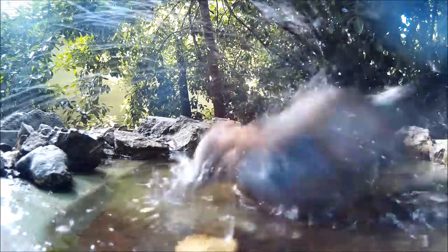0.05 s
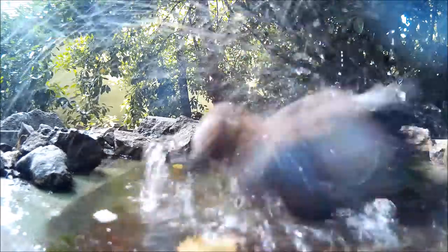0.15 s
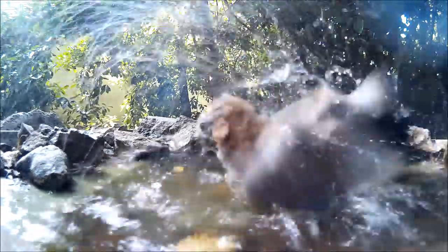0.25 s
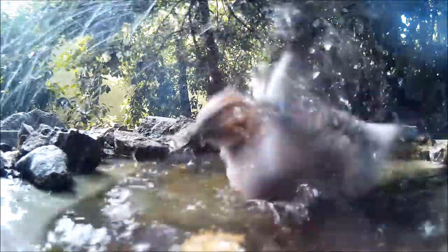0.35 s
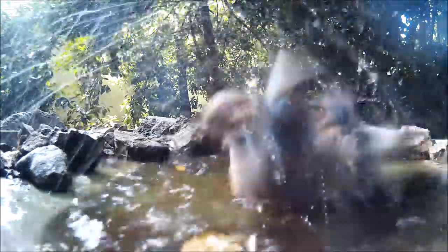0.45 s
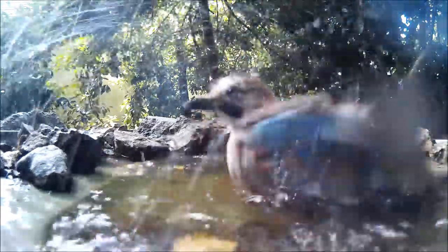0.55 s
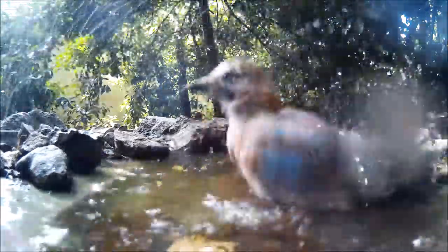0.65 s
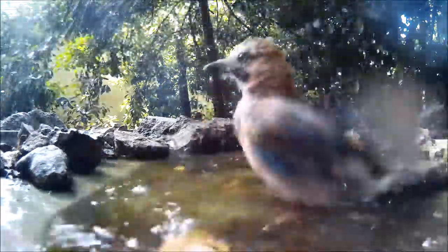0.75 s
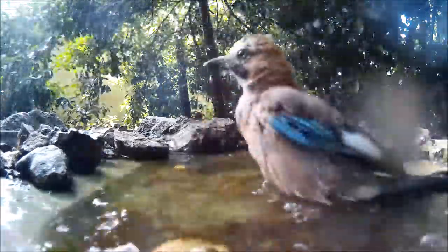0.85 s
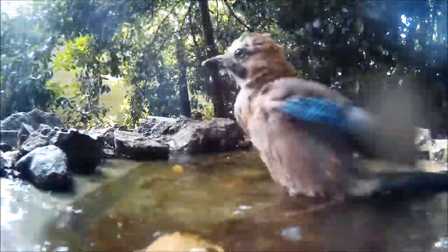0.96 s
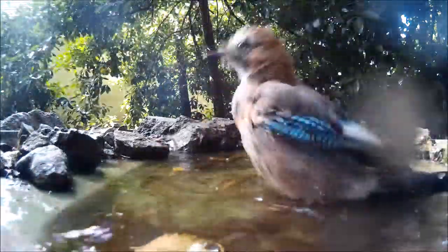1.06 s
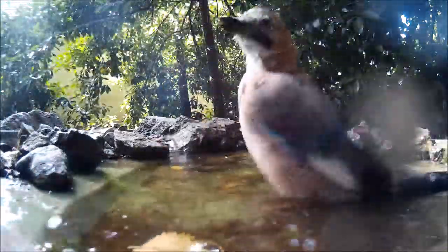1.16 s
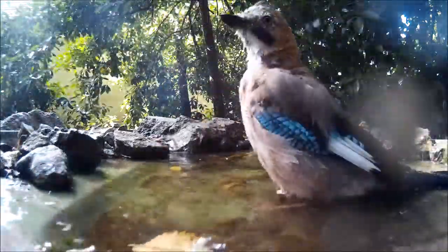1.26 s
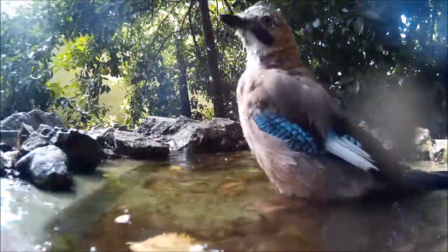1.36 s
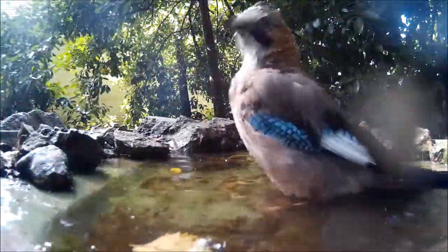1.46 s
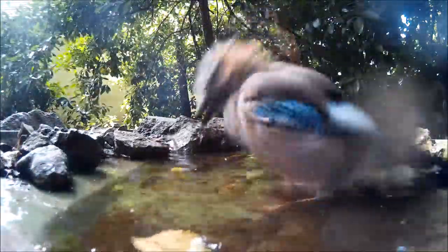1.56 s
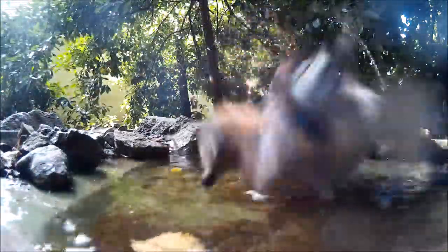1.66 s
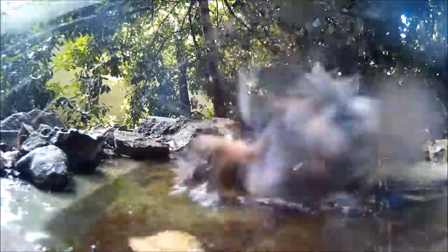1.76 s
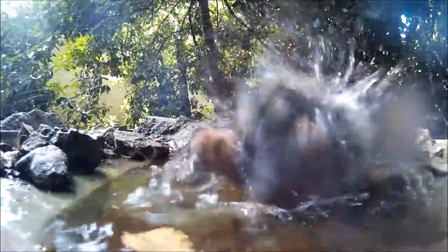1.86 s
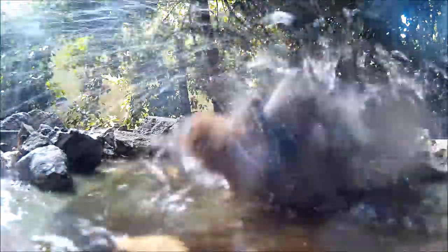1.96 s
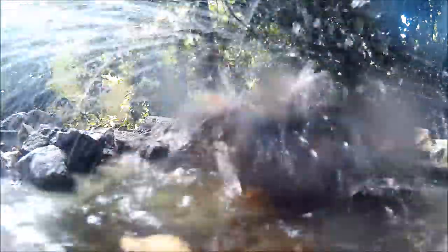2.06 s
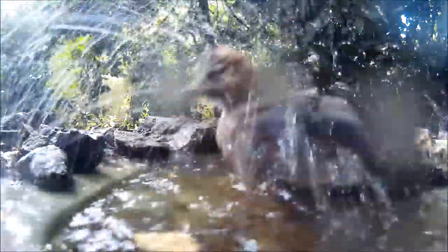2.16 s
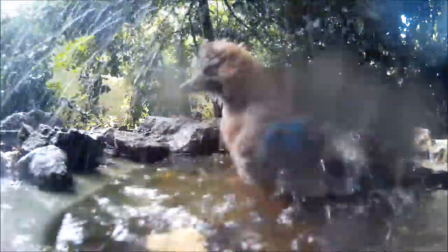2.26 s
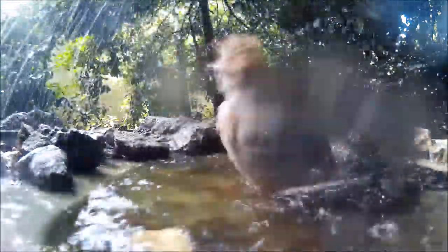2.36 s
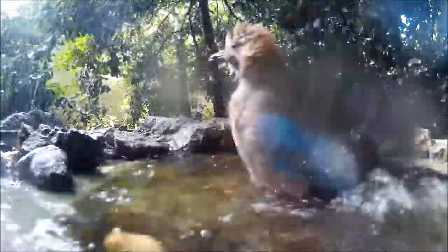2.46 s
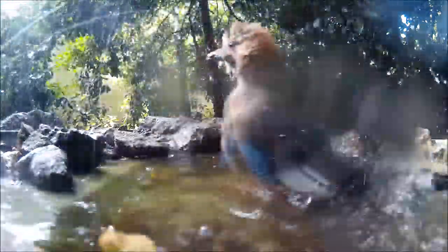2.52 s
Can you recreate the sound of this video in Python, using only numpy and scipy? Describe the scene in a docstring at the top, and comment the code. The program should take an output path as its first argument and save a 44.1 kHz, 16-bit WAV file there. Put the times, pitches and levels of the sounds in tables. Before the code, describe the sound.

Three bouts of bathing in a garden bird bath, heard in mono at close range: quick wing strokes tear up water and fine spray, bubbles blip, and flung drops knock dully on the microphone housing. Soft low puffs of wing air brush past. Between bouts the patter fades to slight sloshing, quiet outdoor air, hiss and a distant engine-like hum.

```python
"""Bird in a garden bath

A bird bathes in a shallow bird bath, close up, right in front of a small camera and its one microphone.
In three bouts it plunges and flutters: strokes tear up shaped noise and ringing grains of water and spray.
The bath patters, fizzes and sloshes, then settles; flung drops thud, ring and splat on the camera's case.
Wings puff at the microphone. Behind: garden air and hiss as noise, and a faint low drone, like a far engine."""
import sys
import numpy as np
from scipy import signal
from scipy.fft import rfft, irfft, next_fast_len
from scipy.io import wavfile
from scipy.ndimage import uniform_filter1d

SR = 44100
rng = np.random.default_rng(int(sys.argv[2]) if len(sys.argv) > 2 else 0)


def persist_wave(psi):
    """Save psi, clipped to +-1, as 16-bit WAV."""
    counts = np.round(np.clip(psi, -1, 1) * 32767).astype(np.int16)
    wavfile.write(sys.argv[1], SR, np.atleast_2d(counts).T)


N = 252693
TIME = np.arange(N) / SR

# runs of wing beats: first_beat_s, last_beat_s, beats, gap_ratio (each gap over the one before),
# first_db, last_db, mist_db (against the splash)
FLUTTERS = [(0.039, 0.321, 5, 0.985, -40.5, -36, -19), (1.745, 2.056, 5, 0.98, -46.5, -38, -14.5),
            (2.353, 2.561, 5, 0.97, -36.5, -34.5, -15.5), (4.271, 4.613, 5, 0.936, -38.5, -41.5, -17),
            (5.028, 5.376, 7, 1.06, -42, -39, -18.5)]
# single plunges of the head, body or tail: middle_s, length_s, splash_db
PLUNGES = [(0.261, 0.016, -32.5), (0.312, 0.015, -34), (0.45, 0.031, -44.5), (.553, 0.0095, -36.5),
           (0.672, 0.016, -44.5), (0.796, 0.018, -43), (1.039, 0.015, -52), (1.197, 0.017, -57.5),
           (1.914, 0.0044, -45.5), (1.939, 0.011, -26), (2.199, 0.0083, -44.5), (2.243, 0.02, -43),
           (2.452, 0.011, -30), (2.724, 0.023, -46), (2.874, 0.02, -49), (2.908, 0.0058, -41),
           (4.337, 0.014, -44.5), (4.483, 0.0092, -39), (4.513, .012, -31.5), (4.663, .014, -38.5),
           (4.843, 0.0095, -41), (4.919, 0.0051, -35), (5.51, 0.01, -41.5)]
# spells in which the bird keeps the water stirred: start_s, end_s, churn_db
STIRS = [(.08, 0.293, -49), (1.82, 1.918, -48), (2.17, 2.222, -53.5), (2.4, 2.497, -53), (4.28, 4.353, -55),
         (4.49, 5.09, -53.5)]
# single large bubbles: start_s, peak_db, pitch_hz, t60_s
BUBBLES = [(0.099, -30, 1310, 0.019), (0.111, -49, 1340, 0.021), (0.565, -29.5, 1540, 0.0083),
           (0.728, -44.5, 1470, 0.0055), (2.742, -34, 2280, 0.019), (2.756, -43.5, 1460, 0.047),
           (4.401, -42.5, 1209, 0.013), (4.464, -41, 1970, 0.033), (4.989, -49, 2600, 0.015),
           (5.04, -33, 1360, 0.0094), (5.216, -42, 1940, 0.0099)]
# drops that stand out on the case: start_s, thud_peak_db, contact_s, ring_peak_db, ring_hz, splat_db
DROPS = [(.0352, -20.5, 0.00038, -16, 521, -28.5), (.0584, -38, .00023, -29, 720, -35.5),
         (.1749, -47, 0.00064, -33, 670, -31), (.1842, -27, 0.00029, -44, 520, -36),
         (.1951, -41, 0.001, -24, 434, -36), (.2598, -13.5, 0.00048, -32, 436, -36),
         (.3198, -39, 0.0009, -18, 520, -32), (.3329, -32, 0.00014, -16, 665, -24.5),
         (.3596, -35, .00055, -29, 430, -59), (.3727, -35, 0.00048, -28, 580, -59),
         (.3831, -39, .0003, -31, 686, -61), (.4208, -20, 0.00084, -22, 436, -56),
         (.4512, -25, 0.00025, -18.5, 460, -34.5), (.4631, -33, 0.0014, -3, 502.6, -27.5),
         (.4664, 1, 0.00067, -20.5, 600, -21.5), (.498, -29, 0.0012, -25.5, 452, -53),
         (.5533, -30, 0.00082, -38, 720, -35), (.5616, -25, 0.00036, -17.5, 1083, -31),
         (.7857, -32.5, 0.0018, -33, 493, -59), (1.0279, -38.5, 0.00036, -50, 486, -48),
         (1.1897, -49, 0.00082, -45, 445, -52), (1.7634, -27.5, 0.00057, -34.5, 626.5, -36.5),
         (1.7856, -28.5, 0.00043, -44, 790, -51), (1.811, -50, .0011, -23, 540, -37),
         (1.8214, -23.5, 0.00036, -19, 493, -31.5), (1.8441, -32, .00036, -30, 560, -36),
         (1.9416, -20.5, 0.00073, -15, 487, -26.5), (1.9459, -24, 0.00052, -12.5, 590, -30),
         (1.9741, -6.5, .00032, -5.5, 642, -16.5), (2.0482, -13.5, 0.00044, -13.5, 477, -30.5),
         (2.0556, -20, 0.00056, -30, 460, -37), (2.0588, -26, 0.00062, -14.5, 676, -41),
         (2.0767, -22, 0.00081, -24, 480, -34), (2.0835, -24, 0.00041, -29, 518, -48),
         (2.0907, -21, 0.00073, -4, 539, -34), (2.1657, -39, .0008, -30, 580, -39.5),
         (2.1868, -35, .001, -27, 446, -33.5), (2.2229, -22.5, 0.00017, -40, 457, -46),
         (2.2375, -13.5, 0.00072, -37, 715, -54), (2.3949, -33, 0.00093, -48, 750, -32),
         (2.4221, -24.5, 0.00036, -37, 740, -42), (2.4486, -29, 0.0022, -34, 514, -27),
         (2.4782, -26, 0.00046, -49, 730, -38), (2.4905, -26.5, 0.0019, -14.5, 565, -23),
         (2.6686, -60, 0.00033, -37, 610, -46), (2.8067, -23.5, 0.001, -19, 487, -35.5),
         (2.819, -15, 0.00073, -40, 870, -42), (2.918, -41, 0.00024, -29, 763, -34.5),
         (2.9723, -56.5, .0003, -41, 470, -56), (3.0126, -34.5, 0.00051, -54.5, 615, -53),
         (4.2707, -34.5, 0.0012, -16, 600, -25), (4.3587, -29, 0.00045, -19.5, 530, -30),
         (4.3671, -9.5, 0.00038, -17, 571, -29), (4.4368, -26.5, .00039, -30, 430, -30),
         (4.5113, -24, 0.00053, -19.5, 520, -36), (4.5196, -20, 0.00074, -19, 1240, -45),
         (4.541, -23, .00055, -25, 520, -32), (4.557, -14.5, 0.00062, -20.5, 553, -50),
         (4.5989, -45, 0.00041, -25.5, 580, -40), (4.6156, -25.5, .00027, -35, 850, -45),
         (4.6275, -35.5, 0.00074, -33, 840, -31.5), (4.6641, -34, 0.00024, -30, 820, -34.5),
         (4.823, -32, .0002, -38, 760, -46), (4.8823, -8, 0.0014, -39, 675, -38),
         (4.887, -19, 0.0013, -14, 493, -62), (4.9297, -36, 0.00045, -30, 470, -23),
         (4.9483, -19, 0.0012, -18, 420, -35), (4.9885, -25.5, 0.00091, -53, 705, -44),
         (5.0282, -33, .0013, -24, 520, -27), (5.0382, -34, 0.00031, -57, 610, -34),
         (5.0452, -38, 0.00026, -50, 780, -30.5), (5.0719, -32, 0.0004, -33, 476, -60),
         (5.086, -50, .00065, -41, 580, -34.5), (5.1273, -40, 0.00059, -38, 810, -25.5),
         (5.132, -30.5, 0.00078, -29.5, 670, -27), (5.214, -24, 0.00046, -34.5, 663, -55),
         (5.246, -25.5, 0.0007, -49, 440, -36.5), (5.3329, -45, 0.00071, -31.5, 456, -42),
         (5.3623, -9.5, .00066, -53, 824, -40), (5.4713, -19.5, 0.00072, -16.5, 520, -52),
         (5.5021, -26.5, .00036, -45, 597, -55.5), (5.6594, -26, 0.00061, -22.5, 542, -43.5)]
# air pushed at the microphone by the wings: middle_s, length_s, level_db
PUFFS = [(0.498, 0.045, -42.5), (0.8, 0.037, -50.5), (1.76, 0.062, -44), (1.82, 0.02, -51),
         (1.925, 0.027, -35), (2.09, 0.04, -45), (2.59, 0.026, -42), (4.337, 0.019, -31.5)]
# the far drone, joined by straight lines: time_s, pitch_hz, level_db
DRONE = [(0, 50.45, -54), (1.3, 46, -75.5), (2.3, 50.9, -50), (2.65, 42, -60), (3.1, 42.6, -61.5),
         (4.15, 46.1, -57.5), (4.7, 46.56, -54), (5.2, 48, -52), (5.73, 46.7, -68)]

# Spectra, relative levels only: frequency_hz, level_db (per Hz)
# torn sheets of water
SHEET_SPECTRUM = [(40, -20.5), (130, -4), (270, 8.5), (400, 5.5), (600, 0), (950, -2), (1400, -3),
                  (1750, -6), (2200, -7), (2800, -25.5), (4000, -29.5), (16000, -69.5)]
# fine spray, from strokes and from bursting drops
SPRAY_SPECTRUM = [(40, -46.5), (1500, -23), (2600, 3.5), (3100, -2), (3750, 6.5), (4300, -0.5),
                  (5000, -6.5), (6200, -15), (7500, -14), (9000, -21.5), (12000, -19), (16000, -31)]
# pattering water
PATTER_SPECTRUM = [(40, -20.5), (130, -2), (270, 12.5), (400, 3.5), (600, 0.5), (950, -1), (1400, -3),
                   (1800, -2.5), (2250, -7.5), (2800, -34), (4000, -40), (16000, -70.5)]
# tiny bursting bubbles
FIZZ_SPECTRUM = [(40, -49), (1500, -16), (2600, 2), (3100, -2.5), (3750, 1.5), (4400, -2), (5200, -10.5),
                 (7500, -19.5), (16000, -34)]
# rocking water
SLOSH_SPECTRUM = [(15, -14), (35, -8), (75, -2), (110, -4.5), (200, -8.5), (450, -14.5), (1500, -31.5),
                  (4000, -55)]
# drops bursting on the case
SPLAT_SPECTRUM = [(40, -41.5), (500, -1.5), (950, -2), (1350, 8), (1800, -8), (2250, -7.5), (2800, -27.5),
                  (4000, -31), (16000, -77.5)]
# wing air on the microphone
PUFF_SPECTRUM = [(8, -17.0), (28, 4.5), (55, -9.5), (90, -1.5), (180, -13.5), (500, -49.5), (4000, -100)]
# low outdoor air
AIR_SPECTRUM = [(15, -12), (30, -5), (72, 0.5), (105, -6), (170, -7.5), (420, -12), (750, -15),
                (1500, -24.5), (3000, -40.5), (16000, -58.5)]
# microphone hiss
HISS_SPECTRUM = [(20, -1), (2000, 0.5), (8000, -0.5), (15000, 0), (16000, -11)]

BEAT_S = 0.012  # how long a wing stays in the water
STROKE_DRAG = 1.21  # a stroke builds up this much slower, and ends this much faster, than an even bell
# mist against splash in the hardest plunge; softer ones raise less of it (dB per dB)
PLUNGE_MIST_DB, MIST_PER_DB = -14.5, 0.18
BUILD_DB_PER_S, SETTLE_DB_PER_S = 186, 40
SLOSH_DB, SLOSH_SETTLE_DB_PER_S = 0.5, 16.5  # the low slosh outlasts the patter
SPLAT_SPRAY_DB = -15.5  # the fine spray of a bursting drop, against its splat
# light drops flung at random; thud and ring levels are against the churn, the splat below those
LIGHT_PER_S, LIGHT_DB, LIGHT_SPREAD_DB = 30, 8, 2.5
LIGHT_CONTACT_S, LIGHT_RING_HZ, LIGHT_SPLAT_DB = 0.00017, (427, 740), -5.5
AIR_DB, AIR_RISE_DB_PER_S = -65, 1.12  # the garden's rumble slowly grows
CUT_HZ = 15800


def wings():
    """Each stroke of wing or body tears up a sheet of water and a mist of fine spray."""
    sheet_power, mist_power = np.zeros((2, N))
    for s, length, splash_db, mist_db in strokes():
        power = stroke_shape(s, length) ** 2
        sheet_power += amp(splash_db) ** 2 * power
        mist_power += amp(mist_db) ** 2 * power
    sheet = water(SHEET_SPECTRUM, per_s=1700, spread_db=6.5, smooth=0.25, cycles=2.9)
    mist = water(SPRAY_SPECTRUM, per_s=3000, spread_db=6.5, smooth=0.19, cycles=2.6)
    return np.sqrt(sheet_power) * steadied(sheet, 0.022) + np.sqrt(mist_power) * steadied(mist, 0.039)


def strokes():
    """Every plunge and wing beat (s, length s, splash dB, mist dB); flutters drift in pace and strength."""
    hardest_db = max(db for _, _, db in PLUNGES)
    rows = []
    for s, length, db in PLUNGES:
        mist_db = db + PLUNGE_MIST_DB + MIST_PER_DB * (db - hardest_db)
        rows.append((s, length, db, mist_db))
    for first, last, beats, gap_ratio, first_db, last_db, mist_db in FLUTTERS:
        steps = np.cumsum(gap_ratio ** np.arange(round(beats))) - 1
        for part in steps / steps[-1]:
            db = first_db + part * (last_db - first_db)
            rows.append((first + part * (last - first), BEAT_S, db, db + mist_db))
    return rows


def stroke_shape(s, length):
    """A stroke drags through the water with growing force, then leaves it more quickly."""
    return np.where(TIME < s, swell(s, length * STROKE_DRAG), swell(s, length / STROKE_DRAG))


def churn():
    """The stirred bath patters, fizzes and sloshes; now and then a large bubble rings, rising in pitch."""
    patter = amp(0.5) * water(PATTER_SPECTRUM, per_s=1000, spread_db=0.5, smooth=0.3, cycles=1.2)
    fizz = water(FIZZ_SPECTRUM, per_s=1300, spread_db=6.0, smooth=0.35, cycles=4.6)
    fizz = amp(-14.0) * steadied(fizz, 0.018)
    slosh = amp(SLOSH_DB) * stirred(SLOSH_SETTLE_DB_PER_S) * noise(SLOSH_SPECTRUM)
    out = stirred(SETTLE_DB_PER_S) * (patter + fizz) + slosh
    for s, db, hz, t60 in BUBBLES:
        add(out, s, amp(db) * mode(hz, rise=0.00019, decay=t60 / np.log(1000), glide=0.008))
    return out


def stirred(settle_db_per_s):
    """The water's motion as a gain: it builds up fast, holds while the bird stirs it, then settles."""
    spells = []
    for start, end, db in STIRS:
        before = BUILD_DB_PER_S * np.maximum(start - TIME, 0)
        after = settle_db_per_s * np.maximum(TIME - end, 0)
        spells.append(db - before - after)
    return amp(np.max(spells, axis=0))


def light_drops():
    """A patter of small drops on the case, one at random in each time slot, weaker as the water settles."""
    level = 20 * np.log10(stirred(SETTLE_DB_PER_S) + 1e-9) + LIGHT_DB
    rows = []
    for slot, (when, thud, ring, pitch, splat) in enumerate(rng.random((400, 5))):
        s = (slot + when) / LIGHT_PER_S
        if s < TIME[-1]:
            luck = np.log(np.clip([thud, ring, splat], 1e-3, 1)) + 1  # averages about 0
            thud_db, ring_db, splat_db = level[int(s * SR)] + LIGHT_SPREAD_DB * luck
            ring_hz = np.interp(pitch, [0, 1], LIGHT_RING_HZ)
            rows.append((s, thud_db, LIGHT_CONTACT_S, ring_db, ring_hz, splat_db + LIGHT_SPLAT_DB))
    return rows


def knocks(drops):
    """Each drop shoves the case (a dead thud, deeper the longer the contact) and rings its wall briefly."""
    t = np.arange(2048) / SR
    out = np.zeros(N)
    wall = mode(560, rise=0.003, decay=0.0082)
    for s, thud_db, contact, ring_db, ring_hz, _ in drops:
        u = t / contact
        # the pressure follows the slope of the drop's force pulse
        pressure = u * (2 - u) * np.exp(-u)
        thud = amp(thud_db) * through_case(pressure, top_hz=617)
        ring = mode(ring_hz, rise=0.00099, decay=0.002)
        ring = amp(ring_db) * through_case(ring, top_hz=1.6 * ring_hz)
        add(out, s, thud + ring + amp(ring_db - 27.0) * wall)
    return out


def through_case(wave, top_hz):
    """The case barely follows a slow push and muffles a sharp one: each blow is a soft swing, peak 1."""
    band = signal.butter(2, [135, top_hz], "band", fs=SR, output="sos")
    wave = signal.sosfilt(band, wave)
    return wave / abs(wave).max()


def splats(drops):
    """Each drop bursts on the case in a few milliseconds of wet crackle, with a faint longer tail."""
    t = np.arange(2048) / SR
    burst = (1 - np.exp(-t / 0.00082)) * (np.exp(-t / 0.0015) + 0.021 * np.exp(-t / 0.014))
    burst = burst / burst.max()
    power = np.zeros(N)
    for s, *_, splat_db in drops:
        add(power, s, (amp(splat_db) * burst) ** 2)
    crackle = steadied(noise(SPLAT_SPECTRUM), 0.0013)
    spray = amp(SPLAT_SPRAY_DB) * steadied(noise(SPRAY_SPECTRUM), 0.0044)
    return np.sqrt(power) * (crackle + spray)


def puffs():
    """Wing beats push air at the microphone: short swells of very low noise."""
    push = sum(amp(db) * swell(s, length) for s, length, db in PUFFS)
    return push * steadied(noise(PUFF_SPECTRUM), 0.3)


def garden():
    """Low outdoor air, a far drone with its octave, and the microphone's hiss."""
    phase = 2 * np.pi * np.cumsum(curve(DRONE)) / SR
    tones = np.sin(phase) + amp(-11.5) * np.sin(2 * phase)
    drone = np.sqrt(2) * amp(curve(DRONE, axis=2)) * tones
    air = amp(AIR_DB + AIR_RISE_DB_PER_S * TIME) * noise(AIR_SPECTRUM)
    return drone + air + amp(-70.5) * noise(HISS_SPECTRUM)


def water(points, per_s, spread_db, smooth, cycles, count=28):
    """Many droplets and tiny bubbles, each ringing for a few cycles, over a smooth fizz."""
    size = next_fast_len(N)
    grains = np.zeros(size)
    for hz in np.geomspace(450, 10000, count):
        grain = mode(hz, rise=0.08 / hz, decay=cycles / hz, glide=0.049)
        draws = rng.random((600, 2))  # at most 600 grains at each pitch
        for when, chance in draws[:int(per_s * N / SR / count)]:
            strength = amp(spread_db * min(-np.log(chance), 3.5))
            add(grains, when * N / SR, grain * hz * strength)
    return colour(unit(grains) + smooth * rng.standard_normal(size), points)[:N]


def mode(hz, rise, decay, glide=0):
    """A short ring of peak 1 that builds up and dies (time constants in s), and may slide up in pitch."""
    t = np.arange(2048) / SR
    envelope = (1 - np.exp(-t / rise)) * np.exp(-t / decay)
    wave = envelope * np.sin(2 * np.pi * hz * t * (1 + glide * t / decay))
    return wave / abs(wave).max()


def swell(s, length):
    """A bell curve whose power stays above half for the given length."""
    out = np.zeros(N)
    near = slice(*np.searchsorted(TIME, [s - 2 * length, s + 2 * length]))
    out[near] = 2 ** (-2 * ((TIME[near] - s) / length) ** 2)
    return out


def steadied(x, length):
    """Evens out the loudness of a texture over the given time (s), keeping its finer grain."""
    power = uniform_filter1d(x ** 2, max(int(length * SR), 2))
    return x / np.sqrt(abs(power) + 1e-6)


def noise(points):
    """Steady noise with a spectrum."""
    return colour(rng.standard_normal(next_fast_len(N)), points)[:N]


def colour(x, points):
    """Gives a steady sound a spectrum, at rms 1."""
    hz, db = np.transpose(points)
    bins_hz = np.fft.rfftfreq(len(x), 1 / SR)
    gain = amp(np.interp(np.log(bins_hz + 1), np.log(hz), db))
    return unit(irfft(rfft(x) * gain, len(x)))


def curve(rows, axis=1):
    """One column of a table of times, joined by straight lines."""
    rows = np.asarray(rows)
    return np.interp(TIME, rows[:, 0], rows[:, axis])


def add(mix, s, sound):
    """Mixes a sound in at a time (s)."""
    part = mix[max(round(s * SR), 0):][:len(sound)]
    part += sound[:len(part)]


def unit(x):
    """Scales to rms 1."""
    return x / np.sqrt(np.mean(x ** 2) + 1e-20)


def amp(db):
    """Decibels to gain."""
    return 10 ** (np.asarray(db) / 20)


def scene():
    """Everything at the one microphone, from the bird in front to the garden behind."""
    drops = list(DROPS) + light_drops()
    return (wings() + churn() + knocks(drops) + splats(drops) + puffs() + garden())[None]


def record(dry):
    """The hardest knocks overload the microphone and clip; then the treble is cut off steeply."""
    clipped = np.clip(dry, -0.9, 0.9)
    lowpass = signal.firwin(511, CUT_HZ, window=("kaiser", 9), fs=SR)
    return signal.oaconvolve(clipped, lowpass[None], "same")


dry = scene()
out = record(dry)
persist_wave(out)
```